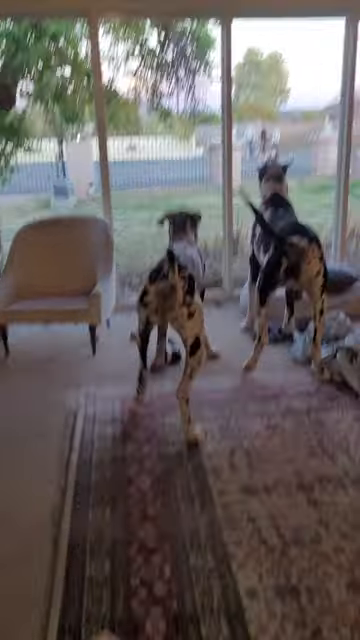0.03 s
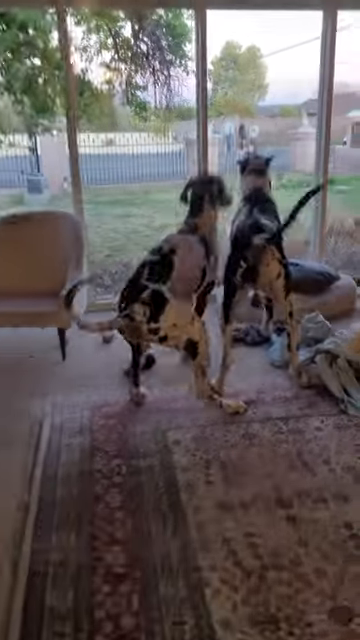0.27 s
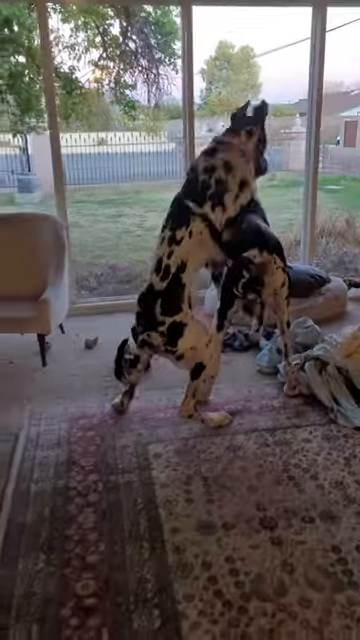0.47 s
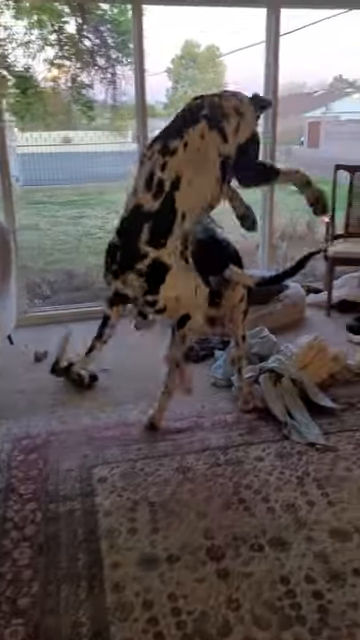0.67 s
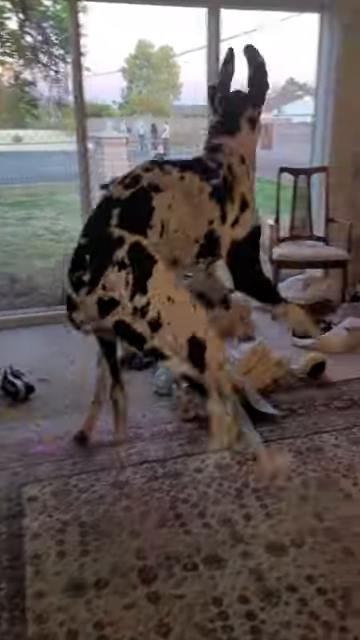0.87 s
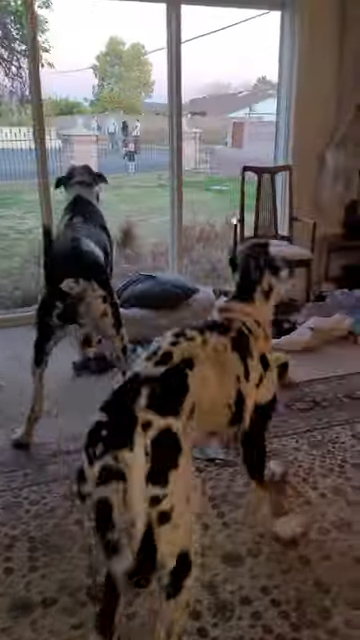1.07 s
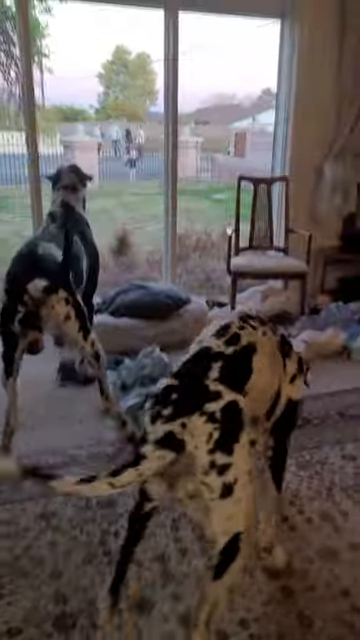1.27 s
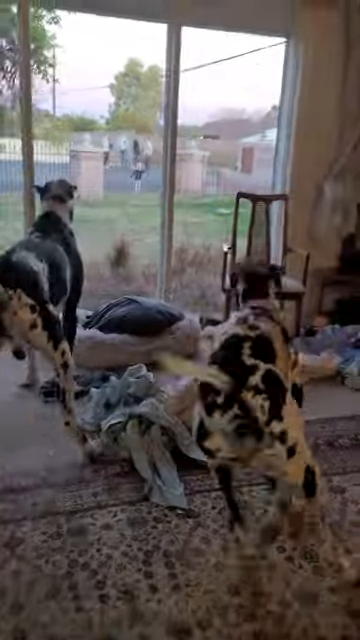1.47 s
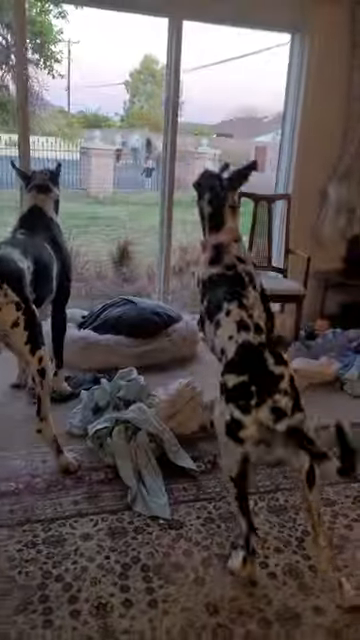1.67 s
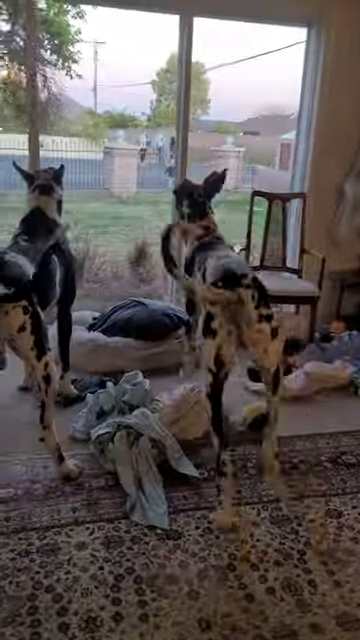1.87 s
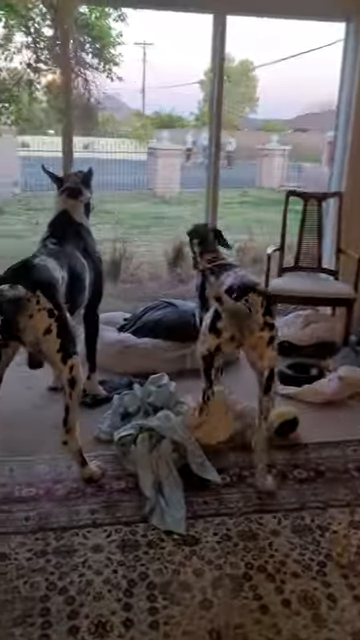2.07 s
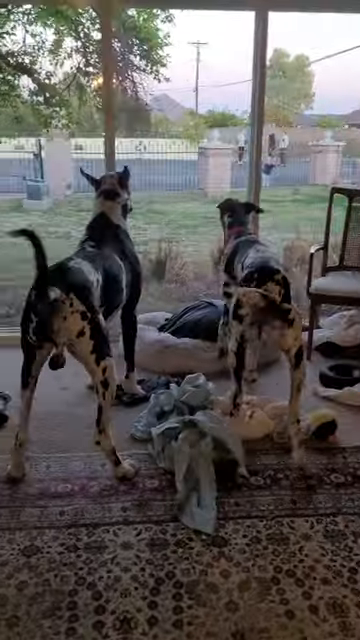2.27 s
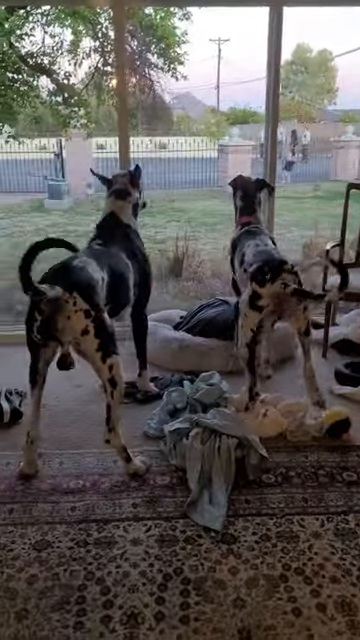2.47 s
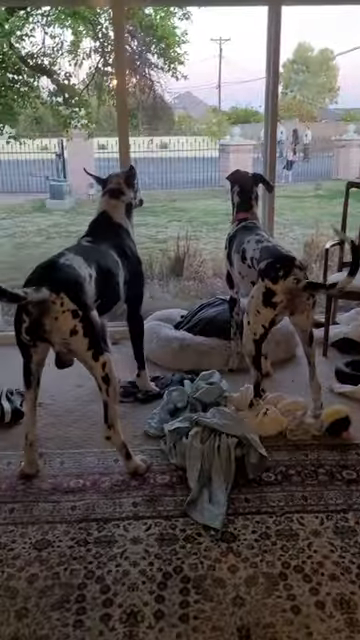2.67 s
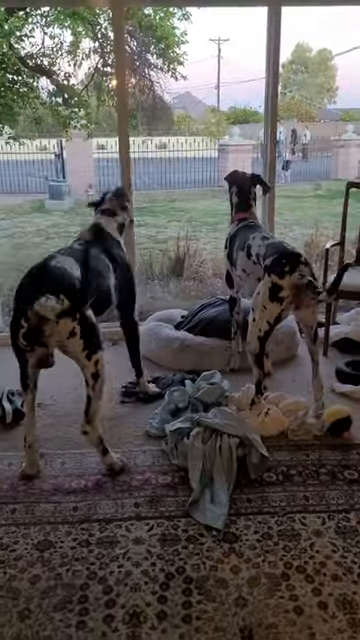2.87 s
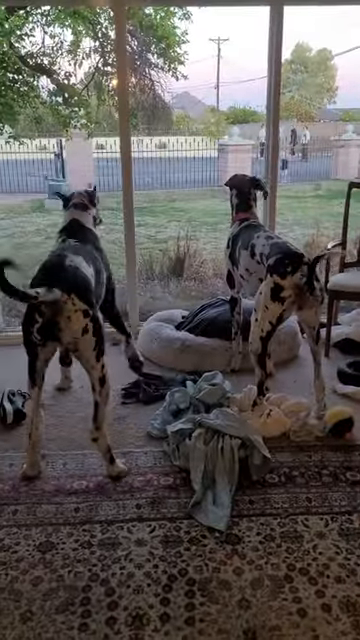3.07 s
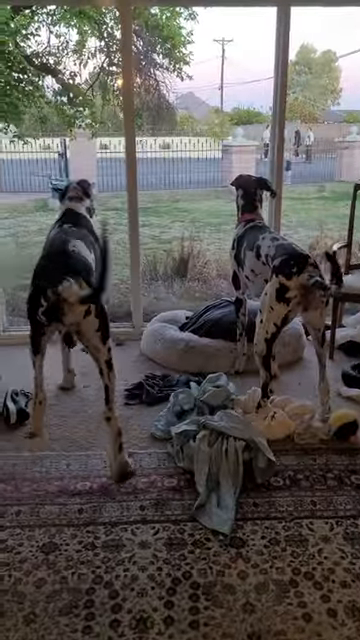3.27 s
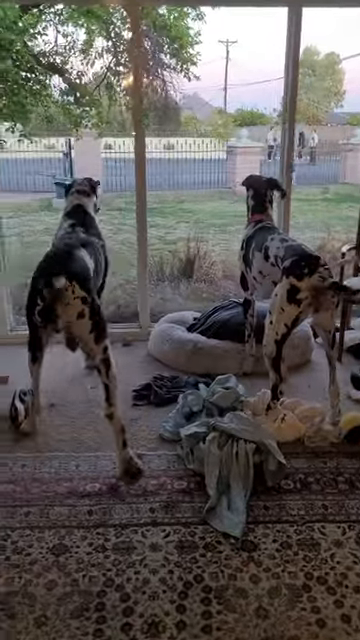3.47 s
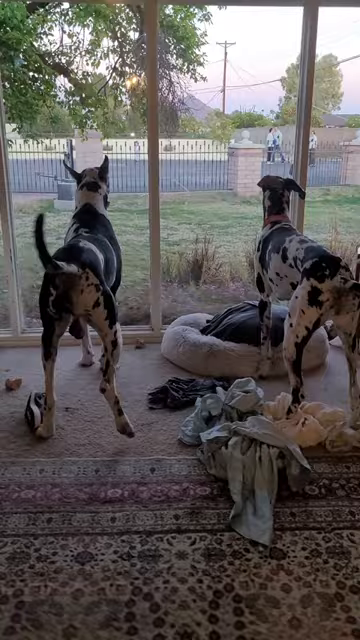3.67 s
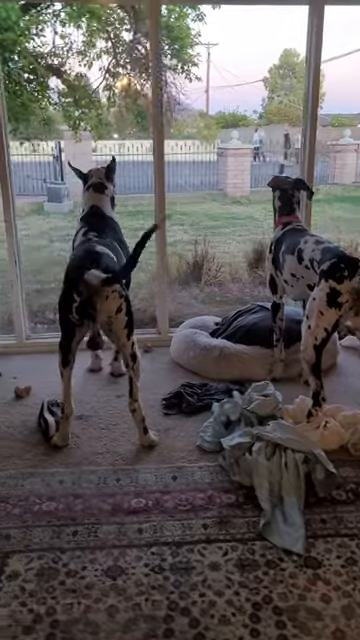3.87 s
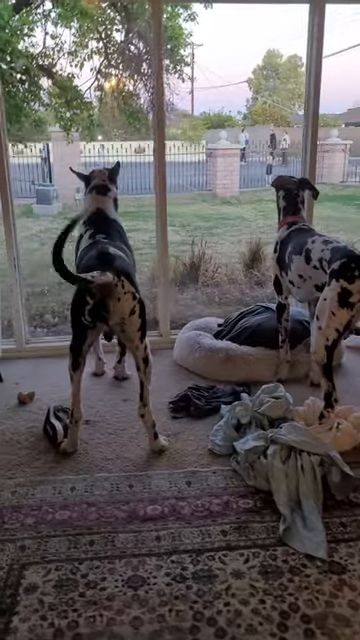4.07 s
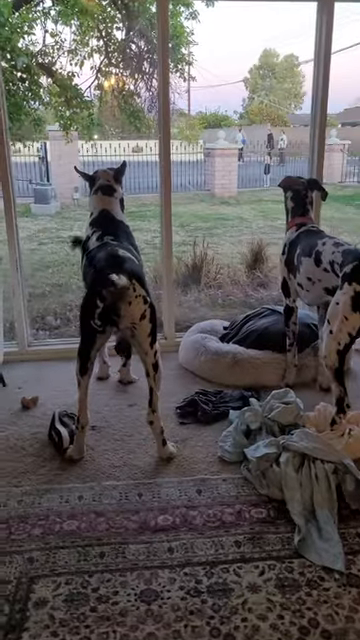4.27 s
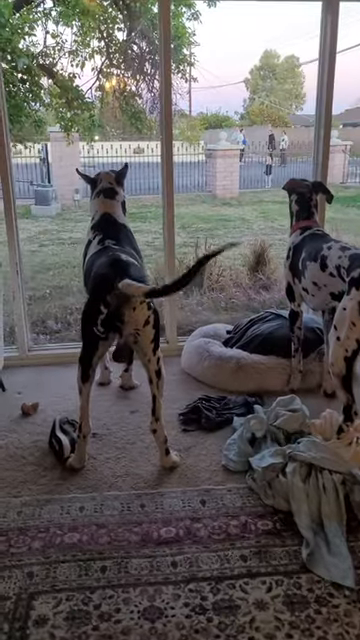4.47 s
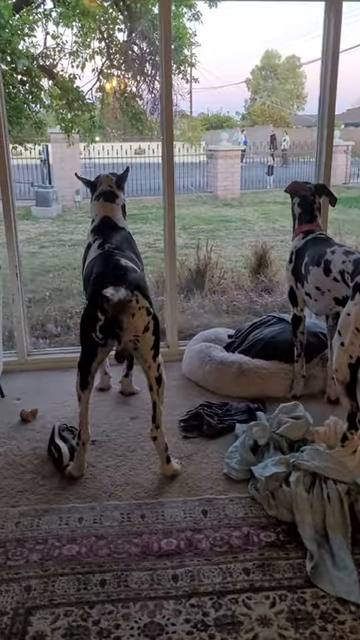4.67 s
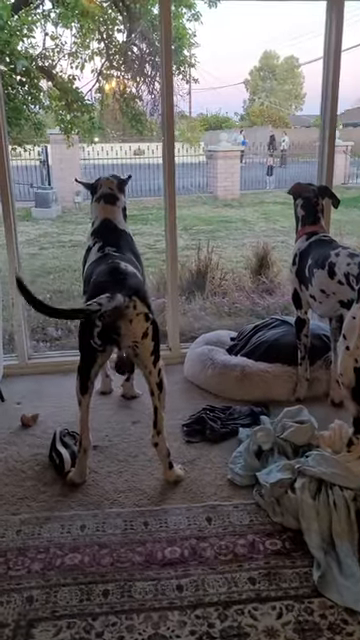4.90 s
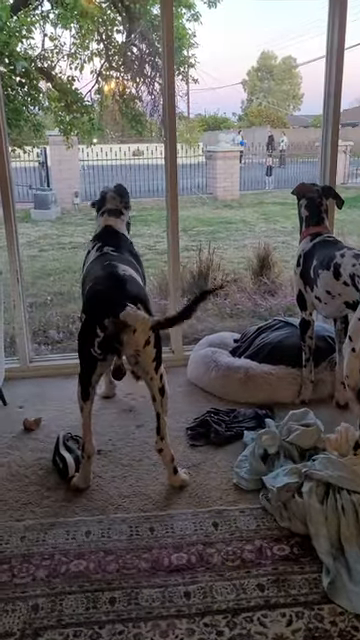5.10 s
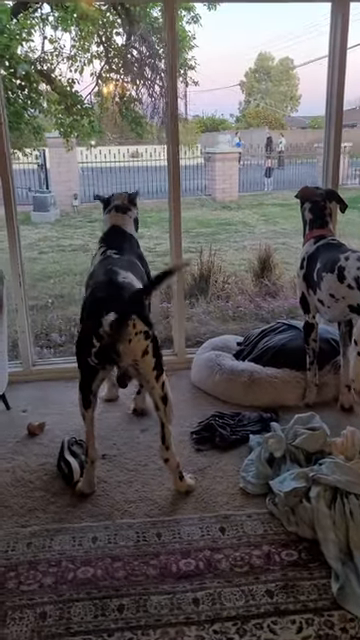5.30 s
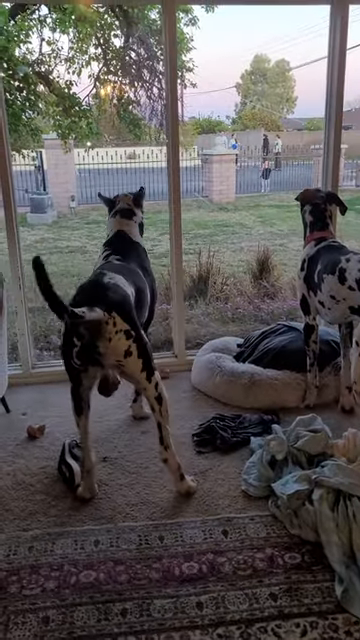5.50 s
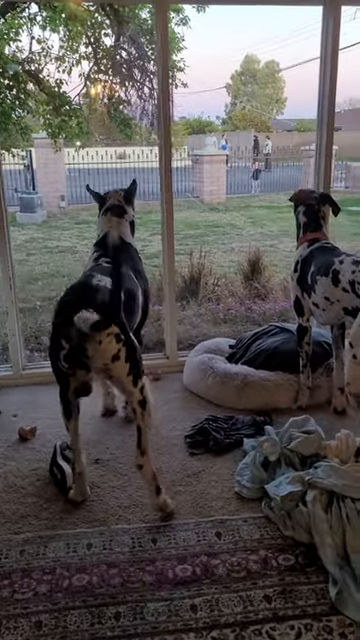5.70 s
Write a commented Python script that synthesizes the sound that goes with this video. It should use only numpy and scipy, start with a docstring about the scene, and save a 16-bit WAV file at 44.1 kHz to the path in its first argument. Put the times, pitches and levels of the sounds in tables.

```python
"""Two big dogs bark at a living-room window: six deep barks in three runs, two of the runs led in by a low growl.
Each bark is a stack of shaky partials on an arch of pitch, hoarse at both ends, with rasp, hiss and a room tail.
Growls are uneven pulses through muzzle resonances; one faint whine is a gliding sine.
Paws thud on ringing floor modes and scuff as shaped noise, a collar ticks, and a limiter holds the peaks."""
import sys
import numpy as np
from scipy import signal
from scipy.fft import rfft, irfft
from scipy.io import wavfile
from scipy.ndimage import uniform_filter1d, minimum_filter1d

SR = 44100
rng = np.random.default_rng(int(sys.argv[2]) if len(sys.argv) > 2 else 0)


def wav_record(signal):
    """Record a signal, one row per channel, as 16-bit PCM in the file named by sys.argv[1]."""
    frames = np.transpose(np.atleast_2d(signal))
    bounded = np.clip(frames, -1, 1)
    # unit amplitude maps onto the largest positive 16-bit level
    quanta = np.round(bounded * 32767).astype(np.int16)
    wavfile.write(sys.argv[1], SR, quanta)


N = 253134
TIME = np.arange(N) / SR


def from_db(db):
    """Decibels to amplitude gain."""
    return 10 ** (np.asarray(db) / 20)


def rms_one(x):
    """Scales a signal to rms 1."""
    return x / np.sqrt(np.mean(np.abs(x) ** 2) + 1e-20)


def in_time(rows):
    """A soft-edged gate that is open while the table lasts, then each column as a curve."""
    s, *columns = np.transpose(rows)
    gate = uniform_filter1d(1. * ((TIME >= s[0]) & (TIME <= s[-1])), size=400)
    return [gate] + [np.interp(TIME, s, c) for c in columns]


def at_hz(points, hz):
    """Reads a table on a log-frequency axis."""
    f, value = np.transpose(points)
    return np.interp(np.log(hz + 1e-9), np.log(f), value)


def envelope(start, length, attack_s, fade_db_per_s, swell_db_per_s=0.):
    """Attack, a hold that may swell, then a steady fade; swell gain is 1 in the middle of the hold."""
    t = TIME - start
    swell_db = swell_db_per_s * (np.clip(t, 0, length) - length / 2)
    fade_db = fade_db_per_s * np.maximum(t - length, 0)
    attack = np.clip(t / attack_s, 0, 1) ** 2
    return attack * from_db(np.maximum(swell_db - fade_db, -200))


def flutter(hz, count=N):
    """Random wavering up to about hz; rms 1."""
    sos = np.tile(signal.butter(2, hz, fs=SR, output="sos"), (2, 1))
    settled = signal.sosfilt(sos, rng.standard_normal(count + 4000))[4000:]
    return rms_one(settled)


def noise(spectrum, alike=0., ripple_db=0.):
    """Stereo noise, steep past the spectrum's ends, with a random ripple of ripple_db along it; mid rms 1."""
    hz = np.linspace(1, SR / 2, 2 ** 17 + 1)
    low_end = 1 / (1 + (spectrum[0][0] / hz) ** 4)
    high_end = 1 / (1 + (hz / spectrum[-1][0] / 1.3) ** 8)
    ripple = ripple_db * flutter(44, len(hz))
    gain = from_db(at_hz(spectrum, hz) + ripple) * low_end * high_end
    mid, side = irfft(rfft(rng.standard_normal((2, 2 ** 18))) * gain)[:, :N]
    # alike is the likeness of left and right
    alike = np.clip(alike, -.5, .98)
    width = np.sqrt((1 - alike) / (1 + alike))
    return rms_one(mid) + width * rms_one(side) * [[1], [-1]]


def resonant_noise(hz, width_hz):
    """Turbulence ringing in one resonance; rms 1."""
    sos = signal.butter(2, [hz - width_hz / 2, hz + width_hz / 2], "band", fs=SR, output="sos")
    return rms_one(signal.sosfilt(sos, rng.standard_normal(N)))


def ring(x, modes):
    """Each mode answers a unit click with a dying sine."""
    out = 0
    for hz, db, t60 in modes:
        radius = from_db(-60 / (t60 * SR))
        w = 2 * np.pi * hz / SR
        poles = [1, -2 * radius * np.cos(w), radius * radius]
        out = out + from_db(db) * signal.lfilter([0, np.sin(w)], poles, x + 1e-18)
    return out


# Decay of the room: pitch_hz, t60_s
ROOM_DECAY = [(100, 0.51), (250, 0.743), (430, 0.389), (700, 0.627), (1200, 0.52), (2000, .55),
              (3500, 0.22), (8000, 0.23), (16000, .22)]
MIC_LAG_S = 0.0004147


def room(x, wet_db, shared_hz=190):
    """Direct sound, reaching the left port first, plus dense reflections with a decay time for each band."""
    t, tail = TIME[:SR], 0
    edges = np.geomspace(50, 18000, 13)
    for low, high in zip(edges, edges[1:]):
        hz = np.sqrt(low * high)
        sos = signal.butter(2, [low, high], "band", fs=SR, output="sos")
        mid, side = signal.sosfilt(sos, rng.standard_normal((2, SR)))
        # long waves reach both ports alike
        band = mid + side * [[1], [-1]] / (1 + (shared_hz / hz) ** 4)
        band = band * from_db(-60 * t / at_hz(ROOM_DECAY, hz)) * np.minimum(t / .006, 1)
        tail = tail + band * np.sqrt(2 * (high - low) / SR / np.sum(band ** 2, axis=1, keepdims=True))
    direct = np.array([x, np.interp(TIME - MIC_LAG_S, TIME, x)])
    return direct + from_db(wet_db) * signal.fftconvolve(x[None], tail, axes=1)[:, :N]


# Background of the house: pitch_hz, level_db (per Hz, relative)
HOUSE_SPECTRUM = [(25, -20), (58, -1.5), (125, -9.5), (170, -14.5), (290, -22), (960, -27.5), (4200, -32),
                  (8000, -34.5), (16000, -45.5)]


def house(level_db=-66.5):
    """Steady low-heavy noise, mostly alike on both sides."""
    return from_db(level_db) * noise(HOUSE_SPECTRUM, alike=.7)


SHUFFLE_ATTACK_S, SHUFFLE_FADE_DB_PER_S = 0.063, 67.5
RUMBLE_BUILD_DB_PER_S = 20.5   # the floor shakes more as the weight comes over
# Floor rumble: pitch_hz, level_db (per Hz, relative)
RUMBLE_SPECTRUM = [(32, -25.5), (40, -8), (50, -11.5), (63, 3.5), (85, -15), (130, -4), (180, -11.5),
                   (300, -33.5)]


def lunges(level_db=-68.0, length_s=0.29):
    """The floor rumbles as the dog throws its weight into each bark."""
    weight = sum(envelope(start, length_s, SHUFFLE_ATTACK_S, SHUFFLE_FADE_DB_PER_S) for start, *_ in BARK_CUES)
    return from_db(level_db) * weight * noise(RUMBLE_SPECTRUM, alike=.85)


# Pads dragging on the pile: pitch_hz, level_db (per Hz, relative)
SCUFF_SPECTRUM = [(88, -33), (150, -13.5), (237, 0), (274, 2.5), (331, -7.5), (367, 4.5), (517, -13.5),
                  (767, -13.5), (985, -17.5), (1800, -30.5), (2340, -51.5), (3960, -120)]
# Brighter brush of cloth and pile: pitch_hz, level_db (per Hz, relative)
RUSTLE_SPECTRUM = [(800, -7.5), (1200, 0), (2700, -6), (3200, -5.5), (4200, -15), (6000, -15),
                   (8000, -21.5), (16000, -26)]
# Dogs shuffling on the carpet: start_s, length_s, rumble_db, scuff_db, rustle_db (before the layer trims)
SHUFFLE_CUES = [(.005, 0.596, -53.5, -42, -56), (1.734, 0.496, -38.5, -42.5, -58),
                (3.673, 0.1454, -37, -39.5, -57), (4.059, 0.1076, -53.5, -58, -87.5),
                (4.642, 0.179, -80, -61, -69), (4.822, 0.05, -37, -67.5, -85),
                (5.363, 0.096, -43.5, -42, -65.5)]


def carpet(rumble_db=-6.5, scuff_db=0.0, rustle_db=0.0, grain_db=1.35):
    """Shifting weight shakes the floor while pads and cloth drag unevenly over the pile."""
    rumble = scuff = rustle = 0
    for start, length, low_db, mid_db, high_db in SHUFFLE_CUES:
        weight = envelope(start, length, SHUFFLE_ATTACK_S, SHUFFLE_FADE_DB_PER_S, RUMBLE_BUILD_DB_PER_S)
        motion = envelope(start, length, SHUFFLE_ATTACK_S, SHUFFLE_FADE_DB_PER_S)
        rumble = rumble + weight * from_db(low_db + rumble_db)
        scuff = scuff + motion * from_db(mid_db + scuff_db)
        rustle = rustle + motion * from_db(high_db + rustle_db)
    drag = scuff * noise(SCUFF_SPECTRUM, alike=0.077) + rustle * noise(RUSTLE_SPECTRUM, alike=0.062)
    # a likeness of 1 is held at the upper limit of noise(): nearly mono
    return rumble * noise(RUMBLE_SPECTRUM, alike=1.0) + drag * from_db(grain_db * flutter(60))


# Buckle colour: pitch_hz, level_db (per Hz, relative)
BUCKLE_SPECTRUM = [(1500, -16.5), (2600, 6), (4000, -19), (5600, -9), (9000, -12), (13000, -8), (16000, -6)]
# Collar ticks: start_s, level_db (before the collar trim)
TICK_CUES = [(0.054, -28.5), (0.0744, -23), (0.1141, -33.5), (2.301, -41), (2.3432, -34), (2.38, -46.5)]


def collar(decay_s=0.003, level_db=-12.5):
    """The buckle's loose parts chatter for a few milliseconds at each jolt."""
    jolts = 0
    for s, db in TICK_CUES:
        jolts = jolts + from_db(db + level_db) * (TIME >= s) * np.exp(-np.abs(TIME - s) / decay_s)
    return uniform_filter1d(jolts, size=300) * noise(BUCKLE_SPECTRUM, ripple_db=-3.5)


def knocks(events, modes, contact_s):
    """Each contact is a short burst of tiny impacts into the modes."""
    force = np.zeros(N)
    for s, db in events:
        burst = rng.standard_normal(2000) * np.exp(-TIME[:2000] / contact_s)
        start = int(s * SR)
        force[start:start + len(burst)] += from_db(db) * burst / np.linalg.norm(burst)
    return ring(force, modes)


def scrapes(level_db=-30.5, attack_s=0.0047, length_s=0.0054, fade_db_per_s=400):
    """Each paw skids briefly on the pile as it lands."""
    skids = sum(from_db(db + level_db) * envelope(s, length_s, attack_s, fade_db_per_s) for s, db in PAW_CUES)
    return skids * noise(RUSTLE_SPECTRUM, alike=.1)


# Paw falls and knocks: start_s, level_db (strength of the contact)
PAW_CUES = [(0.049, -25.5), (0.077, -26), (0.127, -20.5), (0.155, -27), (0.195, -26.5), (0.254, -24.5),
            (0.312, -24), (0.364, -28), (0.43, -24), (0.534, -28.5), (2.24, -44.5)]
# What a paw sets ringing in the floor: pitch_hz, level_db, t60_s
FLOOR_RING = [(63.4, -31.5, .25), (141, -16.5, 0.11), (287, -9, 0.069), (386, -12, 0.044),
              (591.4, -4, 0.037), (776.7, -3.5, 0.018)]


def paws():
    """Thuds ring the floor modes in the room; the skids stay dry."""
    return room(knocks(PAW_CUES, FLOOR_RING, contact_s=0.0079), wet_db=-9.0) + scrapes()


WHINE_GLIDE_HZ_PER_S, WHINE_ATTACK_S, WHINE_FADE_DB_PER_S = 620, 0.021, 109.5


def whine(start, length, hz, level_db, waver=0.032):
    """One faint unsteady tone through the nose, gliding upward."""
    pitch = hz + WHINE_GLIDE_HZ_PER_S * np.clip(TIME - start, 0, 2 * length)
    tone = np.sin(2 * np.pi * np.cumsum(pitch * (1 + waver * flutter(120))) / SR)
    return from_db(level_db) * envelope(start, length, WHINE_ATTACK_S, WHINE_FADE_DB_PER_S) * tone


GROWL_ATTACK_S, GROWL_FADE_DB_PER_S, GROWL_SWELL_DB_PER_S = 0.0351, 346, 23
GROWL_CLIMB_HZ_PER_S = 53
# Nearly closed muzzle: pitch_hz, width_hz, level_db
MUZZLE_RESONANCES = [(122, 63.4, -3.5), (282, 84, 1), (397.1, 92, 0.5), (982, 81, -11), (1644, 190, -25),
                     (3594, 1276, -32)]


def growl(start, length, hz, level_db, jitter=.08, waver_db=3.0, shimmer_db=3.5, air=0.071, limp=0.26):
    """Slow pulses of the folds, strong and weak in turn, with a little air, into the muzzle's resonances."""
    pitch = hz + GROWL_CLIMB_HZ_PER_S * (np.clip(TIME - start, 0, length) - length / 2)
    cycles = np.floor(np.cumsum(pitch * (1 + jitter * flutter(60))) / SR)
    strength = (1 + limp * (-1) ** cycles) * from_db(shimmer_db * flutter(90) + waver_db * flutter(17))
    pulses = np.diff(cycles, prepend=0) * strength + air * rng.standard_normal(N)
    voice = 0
    for centre, width, db in MUZZLE_RESONANCES:
        band = [max(centre - width / 2, 20), centre + width / 2]
        resonance = signal.butter(2, band, "band", fs=SR, output="sos")
        voice = voice + from_db(db) * signal.sosfilt(resonance, pulses)
    shape = envelope(start, length, GROWL_ATTACK_S, GROWL_FADE_DB_PER_S, GROWL_SWELL_DB_PER_S)
    return from_db(level_db) * shape * rms_one(voice)


# Growls: start_s, length_s, pitch_hz (at mid-length), level_db (before the room mix)
GROWL_CUES = [(0.895, .11, 132, -32.5), (1.116, 0.049, 125, -28), (1.218, .14, 128, -37),
              (2.503, .385, 121, -35), (3.118, .17, 129, -41.5), (4.813, .285, 122, -37),
              (5.636, .07, 88, -42.5)]
# Thin whine: start_s, length_s, pitch_hz (at the start), level_db (before the room mix)
WHINE_CUES = [(4.66, .11, 525.9, -52)]


def growls_and_whine():
    """The quieter voices share one place in the room."""
    throat = sum(growl(*row) for row in GROWL_CUES) + sum(whine(*row) for row in WHINE_CUES)
    return from_db(-3.0) * room(throat, wet_db=1.0) * from_db([[-1.2], [1.2]])


# the hiss jumps up with the attack, swells, holds and dies away
HISS_PEAK_S, HISS_HOLD_S, HISS_FADE_S = 0.0805, 0.05516, 0.224
HISS_START_DB, HISS_ATTACK_DB, HISS_END_DB = -23.5, -8, -35.5
PUFF_ATTACK_S, PUFF_FADE_DB_PER_S = 0.06, 185.5
# Air past the teeth: pitch_hz, level_db (per Hz, relative)
HISS_SPECTRUM = [(1500, 8), (2100, 0), (2600, -4), (3300, 3.5), (4100, -4.5), (5100, 1), (6000, -3),
                 (6600, -4.5), (8500, -11.5), (12000, -21), (16000, -26.5)]
# Top octave of the hiss: pitch_hz, level_db (per Hz, relative)
SIZZLE_SPECTRUM = [(7000, -2), (11000, -0.355), (16000, 0)]
# Soft puffs of air after a bark: start_s, length_s, level_db
PUFF_CUES = [(1.241, 0.089, -61), (3.557, 0.023, -55), (5.336, 0.1363, -57)]


def breath(sizzle_db=-4.5, sputter_db=1.6):
    """Each bark's blast of air makes a sputtering hiss past the teeth; softer puffs follow some barks."""
    hiss = sum(from_db(db) * envelope(s, length, PUFF_ATTACK_S, PUFF_FADE_DB_PER_S) for s, length, db in PUFF_CUES)
    for start, attack_s, *_, hiss_db in BARK_CUES:
        fading = start + HISS_PEAK_S + HISS_HOLD_S
        gate, shape_db = in_time([(start, HISS_START_DB), (start + attack_s, HISS_ATTACK_DB),
                                  (start + HISS_PEAK_S, 0), (fading, 0), (fading + HISS_FADE_S, HISS_END_DB)])
        hiss = hiss + gate * from_db(hiss_db + shape_db)
    # a harder blast carries a slightly larger share of sizzle
    sizzle_share = (hiss / hiss.max()) ** 0.091 * from_db(sizzle_db)
    sizzle = sizzle_share * noise(SIZZLE_SPECTRUM, ripple_db=-3.5)
    air = noise(HISS_SPECTRUM, alike=-.05, ripple_db=2.8) + sizzle
    return hiss * from_db(sputter_db * flutter(180)) * air


THROAT_RUSH_HZ, THROAT_RUSH_WIDTH_HZ, THROAT_RUSH_DB = 600, 80, -22
MOUTH_RUSH_DB, MOUTH_RUSH_WIDTH_HZ = -36.5, 110
RUSH_S, RUSH_FADE_DB_PER_S, RUSH_FOLLOWS_SNAP = 0.06, 295.5, .6


def rush():
    """As the jaws part, air rings the throat and the mouth: the stronger the snap, the louder."""
    throat = from_db(THROAT_RUSH_DB) * resonant_noise(THROAT_RUSH_HZ, THROAT_RUSH_WIDTH_HZ)
    out = 0
    for start, *_, snap_db, mouth_hz, mouth_db, _ in BARK_CUES:
        mouth = from_db(MOUTH_RUSH_DB + mouth_db) * resonant_noise(mouth_hz, MOUTH_RUSH_WIDTH_HZ)
        blast = from_db(RUSH_FOLLOWS_SNAP * snap_db) * envelope(start, RUSH_S, RUSH_S, RUSH_FADE_DB_PER_S)
        out = out + blast * (throat + mouth)
    return out


# every bark scoops up to a shoulder, arches over its top, breaks downward and trails off in a grumble
BREAK_S, GRUMBLE_S = 0.031, 0.077
START_HZ, ATTACK_HZ, DROP_HZ, BREAK_HZ, GRUMBLE_HZ = 186.76, 254.52, 401.49, 231.44, 138
# loudness at those stages against the top of the arch; the folds are roughest when barely driven
START_DB, ATTACK_DB, SAG_DB, BREAK_DB, GRUMBLE_DB = -24.5, -10, -2.5, -20, -31.5
START_ROUGH, BREAK_ROUGH, GRUMBLE_ROUGH = 0.523, 0.18, 1
# the overtone lift starts at snap_db, settles lower, then rises again as the pitch breaks
SETTLE_S, SETTLED_LIFT_DB, BREAK_LIFT_DB = 0.0067, -3.5, 2
MOUTH_SETTLED_SHARE = 0.21   # part of the mouth resonance left after settling; it fades out by the break


def bark_gesture(start, attack_s, rise_s, hold_s, shoulder_hz, top_hz, top_share, db, punch_db, rough, snap_db,
                 arch_power=1.9068):
    """One push of air: its gate, pitch, level, roughness, overtone lift and mouth share in time."""
    caught, shoulder = start + attack_s, start + rise_s
    top, drop = shoulder + hold_s * top_share, shoulder + hold_s
    broken, end = drop + BREAK_S, drop + BREAK_S + GRUMBLE_S
    gate, pitch, level_db, roughness = in_time([
        (start, START_HZ, START_DB, START_ROUGH),
        (caught, ATTACK_HZ, ATTACK_DB, (START_ROUGH + rough) / 2),
        (shoulder, shoulder_hz, punch_db, rough),
        (top, shoulder_hz, 0, rough),
        (drop, DROP_HZ, SAG_DB, rough),
        (broken, BREAK_HZ, BREAK_DB, BREAK_ROUGH),
        (end, GRUMBLE_HZ, GRUMBLE_DB, GRUMBLE_ROUGH)])
    # the arch lifts the pitch all the way to top_hz at its crest
    arch = 1 - np.interp(TIME, [shoulder, top, drop], [1, 0, 1]) ** arch_power
    pitch = pitch + (top_hz - pitch) * arch
    lift_times = [shoulder, shoulder + SETTLE_S, drop, broken]
    lift_db = np.interp(TIME, lift_times, [snap_db, SETTLED_LIFT_DB, SETTLED_LIFT_DB, BREAK_LIFT_DB])
    mouth_share = np.interp(TIME, lift_times, [1, MOUTH_SETTLED_SHARE, MOUTH_SETTLED_SHARE, 0])
    return gate, pitch, db + level_db, roughness, lift_db, mouth_share


MOUTH_WIDTH_HZ = 90
# Throat gain on each partial: pitch_hz, level_db
THROAT_GAIN = [(100, -8.5), (170, -13.5), (240, -3), (450, 1), (570, 0), (720, -9.5), (840, -12),
               (1100, -6.5), (1500, -21.5), (2200, -29.5), (3000, -33)]
# Turbulence at the folds: pitch_hz, level_db (per Hz, relative)
RASP_SPECTRUM = [(420, -7.5), (560, -2), (720, -17), (850, -5.5), (1150, 3.5), (1400, -8), (2100, -22),
                 (2600, -31), (4000, -23)]


def bark(gesture, mouth_hz, mouth_db, jitter=0.045, chaos_hz=72, overtone_chaos=0.7, slope_db=-8.0,
         half_db=-3.0, rasp_db=-20.5, brighten=0.1, firm_db=3.5):
    """Vocal folds driven hard: the pitch jitters, every partial shakes, and uneven cycles add half-way partials."""
    gate, *curves = bark_gesture(*gesture)
    on, out = gate > 1e-6, np.zeros(N)
    pitch, level_db, rough, lift_db, mouth_share = [c[on] for c in curves]
    count, rough = len(pitch), np.clip(rough, .02, 1)
    phase = 2 * np.pi * np.cumsum(pitch * (1 + jitter * rough * flutter(190, count))) / SR
    # the harder the push, the more sharply the folds close and the stronger the overtones
    bright_db = lift_db + brighten * (level_db - firm_db)
    # partials 1, 1.5, 2 ... 8
    for k in np.arange(2, 17) / 2:
        shake = flutter(chaos_hz, count) + 1j * flutter(chaos_hz, count)
        depth = rough * (1 if k == 1 else overtone_chaos * k)
        if k % 1:
            strength = from_db(half_db) * np.sqrt(rough) * shake
        else:
            strength = (1 + depth * shake) / np.sqrt(.5 + depth ** 2)
        mouth_gain_db = mouth_share * mouth_db / (1 + ((k * pitch - mouth_hz) / MOUTH_WIDTH_HZ) ** 2)
        tract_db = at_hz(THROAT_GAIN, k * pitch) + mouth_gain_db
        folds_db = level_db + slope_db * np.log2(k) + bright_db * (k > 1)
        out[on] += np.real(strength * np.exp(1j * k * phase)) * from_db(folds_db + tract_db)
    # turbulence puffs out each time the folds open
    puffs = (1 + np.cos(phase)) * noise(RASP_SPECTRUM, ripple_db=9.0).mean(axis=0)[on]
    out[on] += puffs * np.sqrt(rough) * from_db(level_db + bright_db + rasp_db)
    return out * gate


# Barks: start_s, attack_s, rise_s, hold_s, shoulder_hz, top_hz, top_share (place of the top in the hold, 0-1),
# level_db (relative), punch_db (at the shoulder), roughness (0-1), snap_db (overtone lift as the jaws snap open),
# mouth_hz, mouth_db, hiss_db
BARK_CUES = [(.624, .018, .050, 0.0928, 362.1, 446, .36, 0, -4.5, 0.11, 13.5, 719.2, 12, -35),
             (0.979, .032, 0.05443, 0.1115, 381.6, 452.9, .26, -2.5, 5, 0.14, -1.5, 1111, 10, -39.5),
             (1.356, 0.03704, .056, .110, 393.9, 479.7, .60, -3.5, -1.5, 0.15, 10, 1184, 10, -43),
             (2.87, .042, 0.053, .126, 374.9, 463.3, .70, -2.5, 3.5, 0.06, 6.5, 1090, 3.5, -38),
             (3.282, .036, .064, 0.1146, 433.7, 494.1, .38, -2.5, -5.5, 0.3, 8, 1185, 10, -41),
             (5.085, 0.02966, .060, 0.1222, 375.9, 512.2, 0.6, -1, 1.5, 0.23, 1, 1135, 14, -37.5)]
# Standing waves of the room: pitch_hz, level_db, t60_s
ROOM_MODES = [(132, -64.5, 0.39), (446.2, -69.5, 0.53)]


def barks():
    """Folds and rushing air excite the room's standing waves and its reflections."""
    voice = sum(bark(gesture, mouth_hz, mouth_db) for *gesture, mouth_hz, mouth_db, _ in BARK_CUES) + rush()
    voice = voice + ring(voice, ROOM_MODES)
    return from_db(-5.5) * room(voice, wet_db=0.0) * from_db([[-1.0], [.8]])


def scene():
    """The dogs' voices and paw thuds sound through the room, with the other layers dry over a quiet background."""
    floor = (carpet() + lunges()) * from_db([[-1.0], [1.0]])
    return house() + floor + collar() + paws() + growls_and_whine() + breath() + barks()


def record(dry, ceiling=0.899, release_db_per_s=120, cutoff_hz=15900):
    """A look-ahead limiter holds the barks under full scale; the top is cut."""
    over_db = np.maximum(20 * np.log10(np.abs(dry).max(axis=0) / ceiling + 1e-9), 0)
    # gain reduction jumps to each peak and recovers at a steady rate
    held_db = np.maximum.accumulate(over_db + release_db_per_s * TIME) - release_db_per_s * TIME
    gain_db = uniform_filter1d(minimum_filter1d(-held_db, size=200), size=200)
    low_pass = signal.ellip(12, .1, 90, cutoff_hz, fs=SR, output="sos")
    return signal.sosfilt(low_pass, dry * from_db(gain_db))


dry = scene()
out = record(dry)
wav_record(out)
```